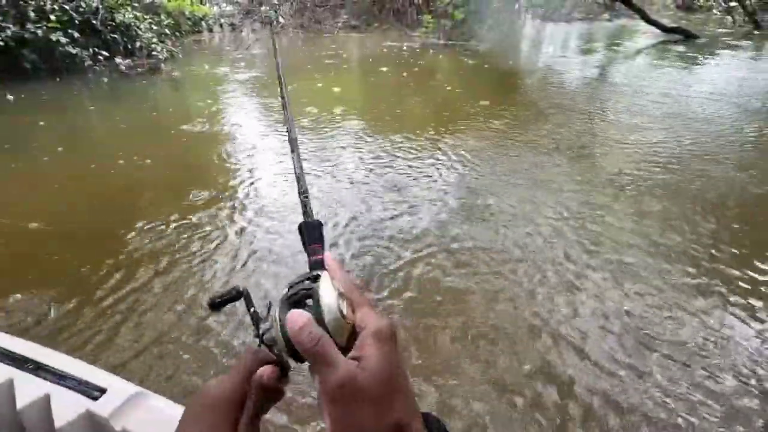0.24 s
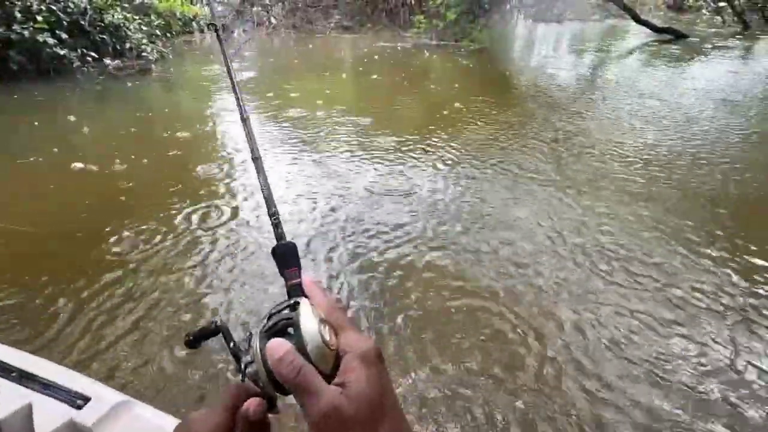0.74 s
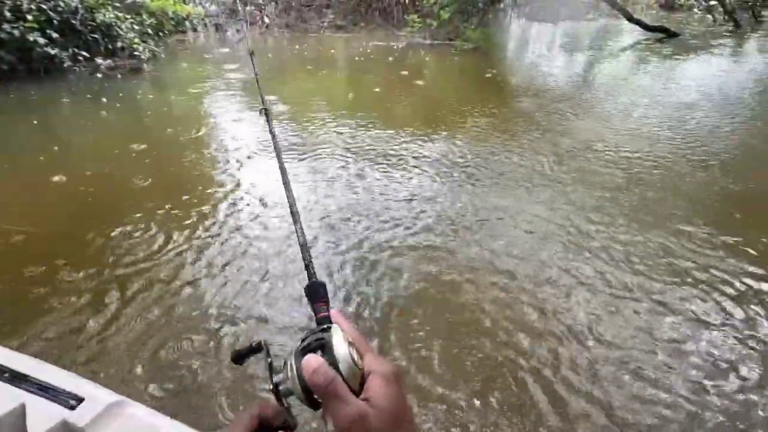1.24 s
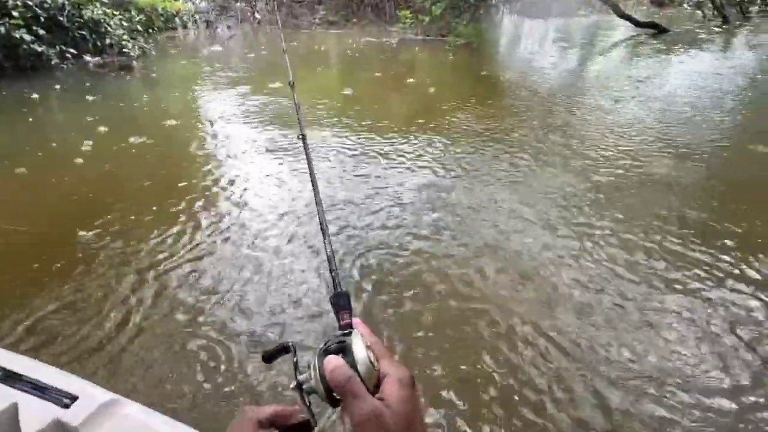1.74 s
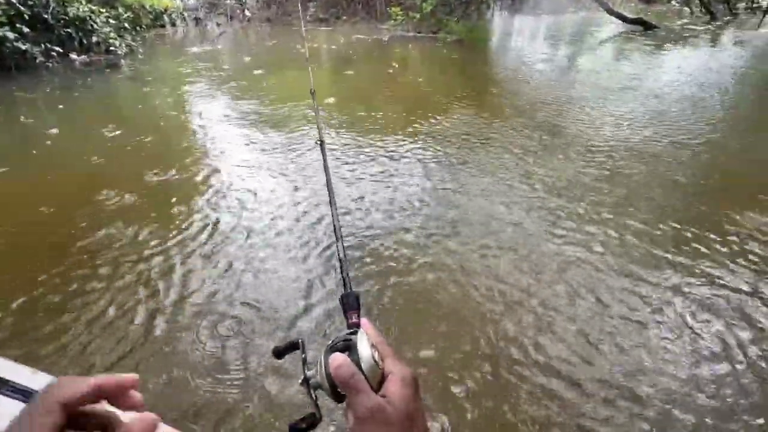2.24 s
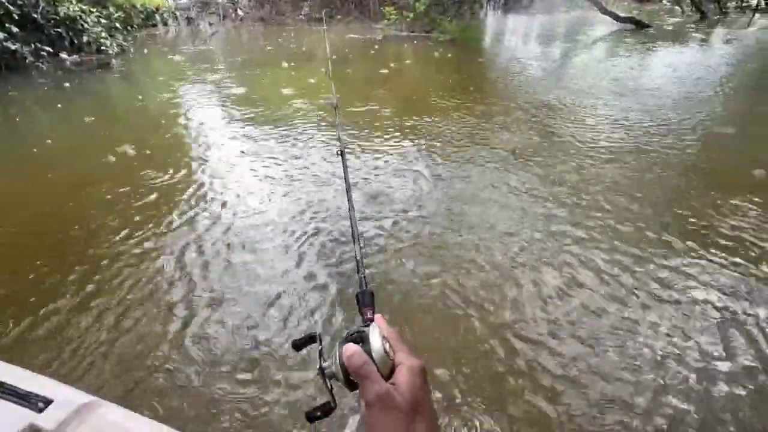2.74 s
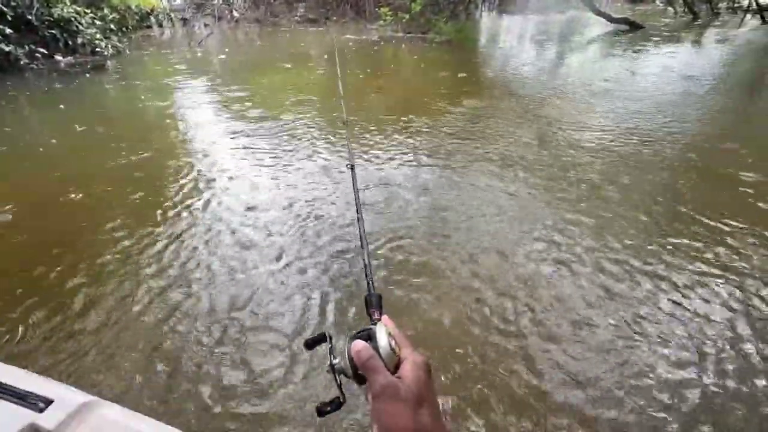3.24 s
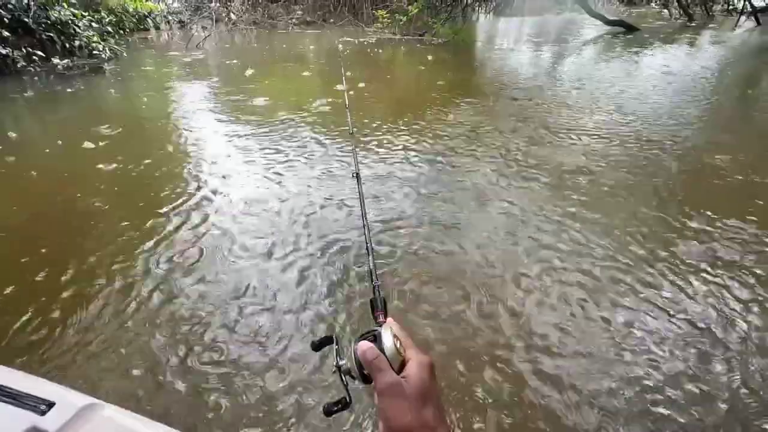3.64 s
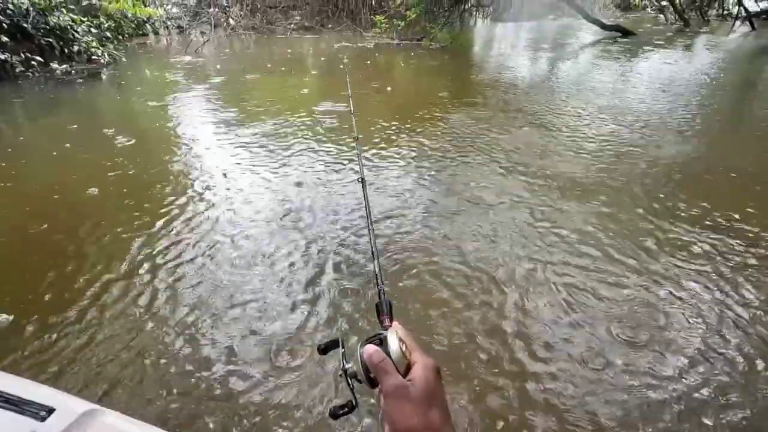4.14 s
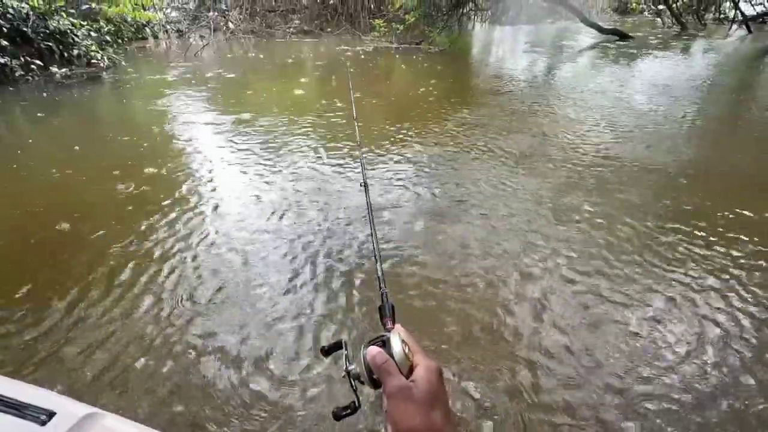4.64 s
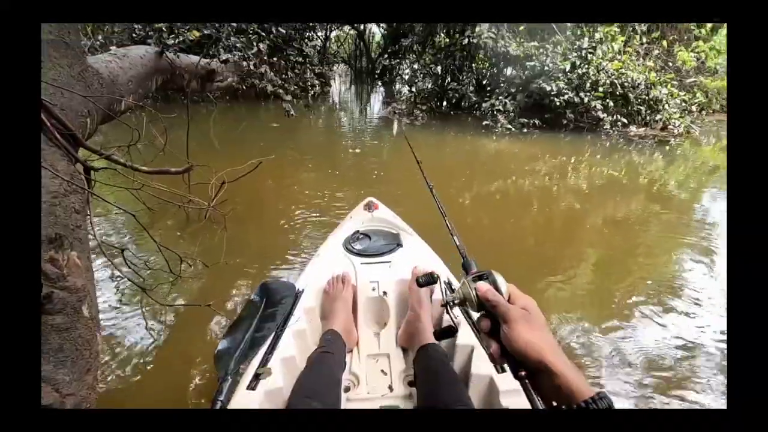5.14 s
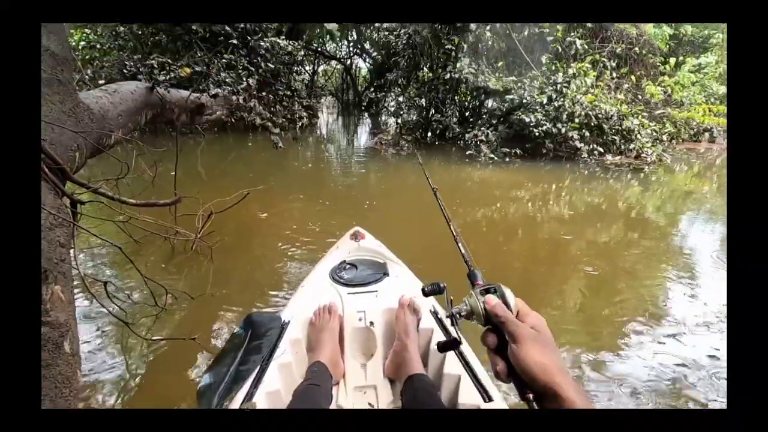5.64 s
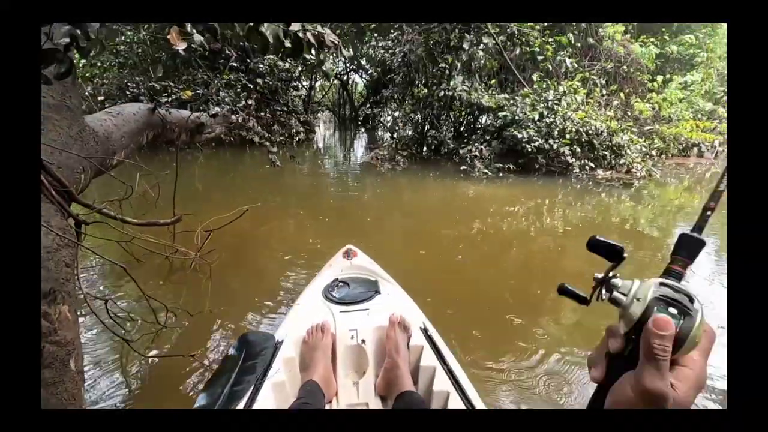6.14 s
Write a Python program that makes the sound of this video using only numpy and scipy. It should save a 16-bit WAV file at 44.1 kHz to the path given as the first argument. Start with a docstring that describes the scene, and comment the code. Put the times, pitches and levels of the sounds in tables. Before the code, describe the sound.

Hollow hull slaps, gurgles and bright drips in swelling light rain, then abruptly a calmer river with cicadas, a sharp reel click and a warbling bird.

```python
"""A sheltered river around a plastic kayak, in light rain: filtered noise makes the hiss, sloshing and air rumble,
short bubble tones make the drops, and ringing hull modes make the knocks of small waves.
A fishing rod swishes as moving bands of noise, and birds call from the banks as gliding near-sines.
After a brief, almost silent cut the rain hiss is gone: a quiet river drips, cicadas hiss in the trees,
a bird warbles and a reel latch snaps as a burst of noise."""
import sys
import numpy as np
from scipy import signal
from scipy.fft import rfft, irfft
from scipy.io import wavfile
from scipy.ndimage import uniform_filter1d

SR = 44100
rng = np.random.default_rng(int(sys.argv[2]) if len(sys.argv) > 2 else 0)


def wav_record(signal):
    """Record a signal, one row per channel, as 16-bit PCM in the file named by sys.argv[1]."""
    frames = np.transpose(np.atleast_2d(signal))
    bounded = np.clip(frames, -1, 1)
    # unit amplitude maps onto the largest positive 16-bit level
    quanta = np.round(bounded * 32767).astype(np.int16)
    wavfile.write(sys.argv[1], SR, quanta)


N = 281348

# almost silent gap between the two scenes: (start [s], end [s])
CUT = (4.705, 4.722)
# colour of a water splash: (frequency [Hz], level [dB])
SPLASH = [(300, 5.5), (1200, 4), (7000, 4), (11000, -12), (16000, -16)]
BIRD_PAN_DB = 1.5  # left minus right


def amp(db):
    """Turns decibels into a gain."""
    return 10 ** (np.asarray(db) / 20)


def evened(x):
    """Scales a signal to an rms of 1."""
    return x / np.sqrt(np.mean(x ** 2) + 1e-20)


def read(points, hz):
    """Reads a frequency table at the frequencies hz, along a logarithmic scale."""
    f, value = np.transpose(points)
    return np.interp(np.log(hz + 1), np.log(f + 1), value)


def curve(rows):
    """Draws a (time, level) table out to every sample."""
    s, level = np.transpose(rows)
    return np.interp(np.arange(N) / SR, s, level)


def sides(pan_db):
    """Gives left and right gains for a level difference, left minus right."""
    return amp(np.array([pan_db / 2, -pan_db / 2]))


def add(mix, s, sound, pan_db=0):
    """Lays a mono sound into the stereo mix at second s."""
    part = mix[:, round(s * SR):][:, :len(sound)]
    part += sides(pan_db)[:, None] * sound[:part.shape[1]]


def coloured(x, spectrum):
    """Filters short bursts; the padding leaves room for the filter's own ring."""
    size = 2 * x.shape[-1]
    gain = amp(read(spectrum, np.fft.rfftfreq(size, 1 / SR)))
    return irfft(rfft(x, size) * gain)[..., :size // 2]


def noise(spectrum, patchy_db, flicker_db, size=1024, alike=None):
    """Makes stereo noise at two microphone ports, with drifting patches and a flicker shared by all bands."""
    # how alike the two ports are: (frequency [Hz], likeness [-1 to 1])
    likeness = [(60, 0.69), (150, 0.99), (380, 1), (950, 0.8), (2380, 0.54), (5980, 0.82), (15000, 0.19)]
    # phase between the ports: (frequency [Hz], phase [radians])
    phase_lead = [(60, 0.086), (1600, -0.2), (3600, -0.92), (5000, 0.27), (15000, .2)]
    # balance of the ports: (frequency [Hz], left minus right [dB])
    balance = [(60, -0.5), (180, -0.5), (550, -0.5), (1650, 2.5), (4970, 0.5), (15000, 5)]
    frames, hz = N // (size // 4) + 5, np.fft.rfftfreq(size, 1 / SR)
    a, b, c, d, patches = rng.standard_normal((frames, len(hz), 5), dtype=np.float32).T
    patches = uniform_filter1d(uniform_filter1d(patches, size=10, axis=0), size=10, axis=1)
    patches = evened(patches)
    flicker = evened(uniform_filter1d(rng.standard_normal(frames), size=3))
    same = read(likeness, hz) if alike is None else alike + 0 * hz
    same = np.clip(same, -1, 1)[:, None]
    left = a + 1j * b
    shared = same * left * np.exp(-1j * read(phase_lead, hz))[:, None]
    right = shared + np.sqrt(1 - same ** 2) * (c + 1j * d)
    z = (np.array([left, right]) * sides(read(balance, hz))[:, :, None]).astype(np.complex64)
    z *= amp(read(spectrum, hz)[:, None] + patchy_db * patches + flicker_db * flicker)
    return evened(signal.istft(z, nperseg=size, noverlap=size * 3 // 4)[1][:, :N])


def note(hz, db):
    """Sings a sine that follows its pitch and level sample by sample, with softened ends."""
    wave = np.sqrt(2) * np.sin(2 * np.pi * np.cumsum(hz) / SR)
    return amp(db) * wave * signal.windows.tukey(len(hz), .2)


def waver():
    """Makes a quick, smooth unsteadiness of rms 1 for a bird's level."""
    smooth = uniform_filter1d(rng.standard_normal(N), size=300)
    return evened(uniform_filter1d(smooth, size=300))


def bubble(hz, turns, size=1200):
    """A drop traps a bubble: a tone that soon dies, sooner when high, and glides up a little."""
    t = np.arange(size) / SR
    tone = np.sin(2 * np.pi * hz * (t + 3.3 * t ** 2))
    return tone * amp(-60 * t / (turns / hz + 0.0092)) * (1 - np.exp(-t / 0.00014))


def plinks(per_s, colour, low_hz, top_hz, splashy, count=14):
    """Scatters many small drops or bubbles, a few of them large; each kind has its own tone, splash and place."""
    largest = 2.6  # limit on the random size, in steps of 6.3 dB
    size_db = 6.3 * np.minimum(rng.exponential(1, N), largest)
    weight = amp(size_db) * (rng.random(N) < per_s / SR)
    kind, out, t = rng.integers(0, count, N), np.zeros((2, N)), np.arange(1200) / SR
    for k, hz in enumerate(np.geomspace(low_hz, top_hz, num=count)):
        splash = coloured(rng.standard_normal((2, len(t))) * amp(-60 * t / 0.032), SPLASH)
        ring = (bubble(hz, 38.0) + splashy * splash) * amp(read(colour, hz)) * np.sqrt(hz)
        ring *= sides(rng.normal(2.2, 3.1) * splashy)[:, None]
        for at in np.flatnonzero(weight * (kind == k)):
            out[:, at:at + len(t)] += weight[at] * ring[:, :N - at]
    return evened(out)


def air():
    """Slow pressure heaves differ between the ports, stronger on the left; the faster rumble is shared."""
    # slow air pressure on the ports: (time [s], heave level [dB])
    heave_levels = [(0.0, -36), (0.58, -52.5), (3.05, -48), (3.71, -31.5), (3.87, -41.5), (5.19, -36.5),
                    (5.26, -49), (5.37, -31.5), (5.83, -46.5), (5.92, -34), (6.38, -40)]
    # colours of the heave and of the rumble: (frequency [Hz], level [dB per Hz])
    heave_colour = [(1.8, -49.5), (3.0, 2.5), (17, 7.5), (25, -7.5), (40, -6), (52, -35), (88, -120)]
    rumble_colour = [(15, -3), (25, -15), (38, -5.5), (57, -3.5), (97, -14.5), (130, -22.5), (170, -33),
                     (290, -120)]
    heave_db = curve(heave_levels)
    heave = noise(heave_colour, 0, 0, size=16384, alike=0.33) * sides(6.3)[:, None]
    # the rumble follows the heave, but moves much less
    rumble_db = -48 + 0.23 * (heave_db + 45)
    rumble = noise(rumble_colour, 0, 0.97, size=4096, alike=1.0)
    return amp(heave_db) * heave + amp(rumble_db) * rumble


def rain():
    """Countless drops blur into a hiss, with single plinks on top; both swell as the shower grows."""
    # the shower grows: (time [s], hiss level [dB])
    shower_levels = [(0.0, -70.5), (0.45, -63.5), (2.34, -54), (4.5, -52)]
    # colours of the rain hiss and of the steady top hiss: (frequency [Hz], level [dB per Hz])
    hiss_colour = [(410, -6), (700, -13.5), (808, -15), (933, -3), (1170, 1), (2390, -4), (4090, -3),
                   (7000, -10), (8630, -14.5), (12000, -15.5), (13500, -27), (14900, -38), (16000, -52)]
    top_colour = [(4710, -40), (8000, -23), (10600, -14), (11800, 6), (13100, 8), (14800, 1), (16000, -7)]
    plinks_per_s, plinks_db, top_db = 180, -6, -70.5  # plinks are set against the rain hiss
    small_drops = plinks(plinks_per_s, hiss_colour, 936, 8770, 0.67, count=16)
    shower = noise(hiss_colour, 2.06, 1.12, size=512) + amp(plinks_db) * small_drops
    top_hiss = noise(top_colour, 2.4, 0.94, size=512)
    return amp(curve(shower_levels)) * shower + amp(top_db) * top_hiss


def slosh():
    """Water washes along the hull as low noise, and trapped air gurgles as low bubble tones."""
    # colour of the slosh: (frequency [Hz], level [dB per Hz])
    slosh_colour = [(53, -43), (90, -9), (144, -5.5), (270, -8.5), (612, -15), (674, -12), (749, -15.5),
                    (900, -29.5), (1170, -40), (1980, -120)]
    wash = noise(slosh_colour, 2.0, 1.8)
    gurgles = plinks(40, slosh_colour, 241, 653, 0.039, count=8)
    return amp(-56) * (wash + amp(-6.0) * gurgles)


def knocks():
    """Wavelets drive the hull with a blow, then churning water; its detuned modes ring, nearest ones loudest."""
    # wavelets on the hull: (time [s], peak level [dB], favoured pitch [Hz])
    wavelets = [(0.019, -37.5, 220), (0.162, -36, 493), (0.279, -37.5, 176), (0.444, -39, 298),
                (0.602, -42.5, 554), (0.706, -36, 535), (0.731, -37.5, 453), (0.999, -38.5, 157),
                (1.401, -38.5, 312), (1.931, -36, 500), (1.943, -34.5, 420), (2.449, -34.5, 149),
                (2.612, -34.5, 159), (3.397, -34, 400), (3.436, -37, 300), (3.414, -34, 220),
                (3.592, -41, 298), (3.909, -33, 223), (4.03, -37.5, 436), (4.107, -29, 477),
                (4.115, -31.5, 200), (4.142, -37, 300), (4.528, -37, 390), (5.424, -43, 450)]
    # ringing of the hull, before detuning: (pitch [Hz], level [dB], time to fall by 60 dB [s])
    hull_modes = [(130, -1, 0.092), (221, 1.5, 0.033), (341.6, -1.5, 0.16), (453.4, 9.5, 0.056),
                  (548, 12.5, 0.032), (631, 10.5, 0.055), (830, 3, 0.033), (1010, -5, 0.035)]
    slap_s, slap_longer = 0.0081, 0.9  # churning time of a -42 dB slap; its growth [dB per dB of strength]
    out, t = np.zeros((2, N)), np.arange(5000) / SR
    for s, db, centre_hz in wavelets:
        luck = rng.standard_normal(5000)
        ring = np.zeros(5000)
        for (hz, mode_db, t60), detune in zip(hull_modes, luck):
            fading_db = mode_db - 14.2 * abs(np.log2(hz / centre_hz)) - 60 * t / t60
            ring += amp(fading_db) * np.sin(2 * np.pi * hz * (1 + 0.05 * detune) * t)
        length = slap_s * amp(slap_longer * (db + 42))
        churn = luck * np.exp(-t / length) * np.minimum(t / .003, 1)
        blow = 1.2 * np.exp(-t / 0.0004)
        knock = signal.fftconvolve(ring, churn + blow)
        add(out, s, amp(db) * knock / abs(knock).max())
    return out


def drops():
    """Each near drop breaks the surface with a splash tick of noise and rings the bubble it traps."""
    # single drops: (time [s], bubble level [dB], starting pitch [Hz],
    #                tick level against the bubble [dB], left minus right [dB])
    near_drops = [(0.387, -55, 11500, -9, -5), (0.79, -48, 13000, -7, 2), (0.93, -52, 13500, -7, 0),
                  (1.005, -47, 4500, 4, 0), (1.424, -49, 11000, 3, 2), (3.994, -47.5, 10500, 6.5, 2),
                  (0.163, -57, 830, 5, 3), (0.198, -48, 2460, 7, 0), (0.278, -37, 1850, -26, 0),
                  (0.618, -46, 2470, -18, -3), (0.706, -46, 1700, -3, 7), (0.88, -39.5, 4140, -9, 2),
                  (1.048, -38, 1660, -23, 9), (1.122, -44, 1630, -2, 7), (1.201, -44.5, 1680, -7, 1.0),
                  (1.287, -32.5, 1650, -12.5, 1), (1.629, -39.5, 4070, -3, 5), (2.015, -43.5, 1860, 5.5, 9),
                  (2.041, -36, 6100, -3.5, -6), (2.315, -39, 4080, -7, 7), (2.37, -40.5, 1710, -20, -7),
                  (2.615, -37.5, 2820, 4.5, 3), (2.735, -40, 1030, -20, -7), (3.01, -30.5, 2700, -7, 3),
                  (3.11, -38.5, 4020, -14, -1), (3.147, -37, 2380, -24, -1), (3.683, -36.5, 3790, -21, 6),
                  (3.912, -31.5, 1550, -3.5, 8), (4.009, -34.5, 2000, -11, -17), (4.096, -31, 6900, -9, 0),
                  (4.108, -25, 1306, 5, 9), (4.255, -38, 5030, -1.5, 5), (4.964, -34.5, 6730, -10, 5),
                  (4.983, -37, 1440, -11, 0), (5.09, -44.5, 5150, 1, 4), (5.475, -47, 2880, -10, 11),
                  (5.483, -35, 1590, -18, 1.0), (5.519, -44, 3120, -5, -1), (5.566, -38, 2730, -9, 6),
                  (5.735, -46, 2330, -1, 10), (6.131, -39.5, 3050, -14, 1), (6.211, -41.5, 2980, -21, 2.0)]
    out, t = np.zeros((2, N)), np.arange(1200) / SR
    bursts = rng.standard_normal((len(near_drops), 1200)) * amp(-60 * t / 0.0067)
    ticks = coloured(bursts, SPLASH)
    for (s, db, hz, tick_db, pan_db), tick in zip(near_drops, ticks):
        add(out, s, amp(db) * (bubble(hz, 3.3) + amp(tick_db) * tick), pan_db)
    return out


def banks(x, distance):
    """Wooded banks return sparse echoes of random sign; each band dies at its own speed, slower from afar."""
    # echo at a distance of 1: (frequency [Hz], time to fall by 60 dB [s])
    echo_times = [(300, 1), (1500, 0.31), (5000, 0.38), (12000, 0.16)]
    taps = np.zeros((2, SR // 2))
    grid = np.arange(150, SR // 2 - 20, 20)
    at = grid + rng.integers(0, 20, (2, (SR // 2 - 151) // 20))
    np.put_along_axis(taps, at, rng.choice([-1., 1.], at.shape), 1)
    hz, t, z = signal.stft(taps, SR, nperseg=256)
    fade = amp(-60 * t / (distance * read(echo_times, hz)[:, None]))
    tail = signal.istft(z * fade, SR, nperseg=256)[1]
    return signal.fftconvolve(x, tail / np.linalg.norm(tail[0]), axes=1)[:, :N]


def rushes():
    """Grainy noise rises, holds and falls while its top edge sinks, as a stroke through air or water slows."""
    # a rod stroke, a wave churning along the hull and a hand sliding on the reel, before filtering:
    # (time [s], rise [s], hold [s], fall [s], level [dB], first upper edge [Hz], last upper edge [Hz],
    #  lower edge [Hz])
    strokes = [(0.184, 0.015, 0.085, 0.046, -48, 9400, 2980, 200),
               (0.285, 0.014, .045, 0.012, -60, 3100, 2900, 2300),
               (3.386, 0.01, 0.23, 0.11, -46.5, 1100, 900, 200),
               (4.708, 0.02, 0.075, .12, -42.5, 1340, 1290, 750)]
    rise_db, fall_db = 13, 16  # how far below the held level each rush starts and ends
    colour = [(100, -4), (900, 3.0), (2000, 3.5), (9000, -12.0), (16000, -6.0)]  # (Hz, dB per Hz)
    hz, t, z = signal.stft(noise(colour, 2.0, 1.4, size=256), SR, nperseg=256)
    hz = hz[:, None]
    shape = 0
    for s, rise, hold, fall, db, first_hz, last_hz, low_hz in strokes:
        corners = s + np.cumsum([0, rise, hold, fall])
        level_db = np.interp(t, corners, [db - rise_db, db, db, db - fall_db], left=-200, right=-200)
        edge_hz = np.interp(t, corners[[0, -1]], [first_hz, last_hz])
        upper = 1 + (hz / edge_hz) ** 6
        lower = 1 + (low_hz / (hz + 1)) ** 6
        shape = shape + amp(level_db) / np.sqrt(upper * lower)
    grit = amp(2.5 * evened(uniform_filter1d(rng.standard_normal(N), size=20)))
    return signal.istft(z * shape, SR, nperseg=256)[1][:, :N] * evened(grit)


def chirps():
    """A far bird's hoarse chirp climbs and sags, split into strands with jittery pitch and level."""
    # calls: (time [s], length [s], level [dB], start pitch [Hz], top pitch [Hz])
    calls = [(.35, .1, -71, 4650, 5620), (.5, .095, -70, 4600, 5680), (.645, .075, -68, 4500, 5600),
             (3.752, .11, -61, 4550, 5600), (3.92, .11, -60, 4650, 5680), (4.07, .15, -60, 4500, 5340)]
    # strands of one call: (share of the climb, level [dB])
    strands = [(1, 0), (.68, -6), (.36, -5)]
    climb_s, droop_hz, rasp_hz, flutter_db = .05, 200, 30, 2.4  # time to the top, end sag, jitters
    out = np.zeros((2, N))
    for s, length, db, low_hz, top_hz in calls:
        t = np.arange(0, length, 1 / SR)
        climb = np.sin(np.pi / 2 * np.minimum(t / climb_s, 1))
        droop = droop_hz * (t / length) ** 8
        for share, strand_db in strands:
            rasp, flutter = uniform_filter1d(rng.standard_normal((2, len(t))), size=400)
            hz = low_hz + (top_hz - low_hz) * share * climb - droop + rasp_hz * evened(rasp)
            add(out, s, note(hz, db + strand_db + flutter_db * evened(flutter)), BIRD_PAN_DB)
    return out


def glugs():
    """Large bubbles climb in pitch and fade as they near the surface."""
    # bubbles: (time [s], starting level [dB], starting pitch [Hz])
    large_bubbles = [(.62, -56, 2430), (1.9, -38, 950), (5.262, -67, 980), (5.953, -54, 1300),
                     (6.178, -57, 950)]
    length_s, climb_hz_per_s, fade_db = 0.036, 10200, 17
    out, t = np.zeros((2, N)), np.arange(0, length_s, 1 / SR)
    for s, db, hz in large_bubbles:
        wobble = evened(uniform_filter1d(rng.standard_normal(len(t)), size=150))
        pitch_hz = hz * (1 + 0.04 * wobble) + climb_hz_per_s * t
        add(out, s, note(pitch_hz, db - fade_db * np.sqrt(t / length_s)), 1.5)
    return out


def whistles():
    """Long bird whistles slide up to a held pitch, with a slight waver of level."""
    # whistles: (time [s], length [s], held pitch [Hz], level [dB])
    long_whistles = [(1.967, 0.22, 3370, -65), (2.227, 0.13, 3390, -63.5), (2.763, 0.18, 3450, -64.5)]
    scoop_hz, scoop_s = 170, 0.025  # depth and time constant of the slide
    out = np.zeros((2, N))
    for s, length, hz, db in long_whistles:
        t = np.arange(0, length, 1 / SR)
        add(out, s, note(hz - scoop_hz * np.exp(-t / scoop_s), np.full(len(t), db)), BIRD_PAN_DB)
    return out * amp(1.6 * waver())


def river():
    """Quiet river and leaves blur into soft noise, with a few faint drips."""
    # colour of the river and leaves: (frequency [Hz], level [dB per Hz])
    river_colour = [(53, -34), (90, -1.5), (266, -19.5), (736, -32.5), (1060, -24), (2080, -32),
                    (4640, -33.5), (5770, -33), (6570, -29), (8330, -41), (12300, -42), (16000, -68)]
    drips = plinks(50, SPLASH, 990, 7200, 0.67, count=8)
    return amp(-52.5) * (noise(river_colour, 3.3, 1.6, size=512) + amp(-28.0) * drips)


def cicadas():
    """Many cicadas blend into a high band of noise that slowly fades."""
    # colour of the cicadas: (frequency [Hz], level [dB per Hz])
    cicada_colour = [(5400, -18), (6050, -12), (6500, -3), (7300, -8.5), (7900, -22), (8400, -37)]
    start_db, fade_db_per_s = -61, 1
    level_db = start_db - fade_db_per_s * (np.arange(N) / SR - CUT[1])
    return amp(level_db) * noise(cicada_colour, 0.85, 0.51, size=256, alike=0.32)


def warble():
    """A near bird repeats a phrase of gliding, arching tones; it is heard only after the cut."""
    # one phrase: (time after its start [s], length [s], first pitch [Hz], last pitch [Hz],
    #              arch above that line [Hz], level [dB])
    phrase = [(.002, .072, 3100, 2100, 2600, -63), (0.127, 0.032, 2150, 1550, 0, -64),
              (0.163, .05, 1850, 1900, 800, -63)]
    # starts of the phrases: time [s]
    phrase_starts = [4.555, 5.25, 5.915]
    out = np.zeros((2, N))
    for s in phrase_starts:
        for after, length, first_hz, last_hz, arch_hz, db in phrase:
            u = np.arange(0, 1, 1 / SR / length)
            arch = np.sin(np.pi * u) ** 1.15  # the power narrows the arch
            hz = first_hz + (last_hz - first_hz) * u + arch_hz * arch
            add(out, s + after, note(hz, db), BIRD_PAN_DB)
    return out * amp(3.2 * waver()) * (np.arange(N) > CUT[1] * SR)


def latch():
    """The reel latch snaps: a dry crack of noise with a weaker, longer rattle, and the banks hiss it back."""
    # colour of the snap: (frequency [Hz], level [dB per Hz])
    snap_colour = [(240, -30), (400, -15.5), (1130, -5), (1690, -12.5), (2400, 3.5), (3510, -13), (4090, 7),
                   (4700, -9), (5560, -0.5), (8400, -3.5), (9790, 0), (14400, -20.5), (15500, -36)]
    start_s, energy_db, pan_db = 4.7926, 4, -1.5
    hiss_colour = [(700, -15), (3500, 6.0), (8000, 3.0), (10000, 0.0), (15000, -15)]  # (Hz, dB)
    out, t = np.zeros((2, N)), np.arange(8192) / SR
    envelope = (amp(-60 * t / .006) + amp(-14 - 60 * t / .024)) * (1 - np.exp(-t / .0003))
    crack = rng.standard_normal((2, len(t))) * envelope
    # partly unlike at the two ports
    snap = coloured(crack[0] + 0.18 * crack[1] * [[1], [-1]], snap_colour) * sides(pan_db)[:, None]
    hiss = rng.standard_normal((2, len(t))) * amp(-41.0 - 60 * t / 0.38) * (t > .004)
    tail = coloured(hiss, hiss_colour)
    at = round(start_s * SR)
    out[:, at:at + len(t)] += tail + amp(energy_db) * snap / np.linalg.norm(snap.mean(0))
    return out


def scene():
    """Plays the rainy scene, the almost silent cut and the dry scene."""
    t = np.arange(N) / SR
    water_drops = drops() + glugs()
    far_bird, near_bird = chirps(), warble()
    echo = banks(amp(-2) * near_bird + amp(-8.5) * water_drops, 0.76) + banks(far_bird, 1.6)
    background = np.where(t < CUT[1], rain() + slosh(), river() + cicadas())
    mix = background + air() + knocks() + water_drops + rushes() + echo
    mix += far_bird + whistles() + near_bird + latch()
    return mix * np.interp(t, [CUT[0] - .003, CUT[0], CUT[1], CUT[1] + 0.012], [1, 0.03, 0.028, 0.99])


def record(dry):
    """The housing weakens a narrow band, then the recorder cuts off the highest treble."""
    housing_hz, edge_hz = 738, 15600
    band = signal.lfilter(*signal.iirpeak(housing_hz, 5.0, fs=SR), dry)
    low_pass = signal.firwin(511, edge_hz, window=("kaiser", 9), fs=SR)
    return signal.oaconvolve(dry - 0.47 * band, low_pass[None], "same")


dry = scene()
out = record(dry)
wav_record(out)
```